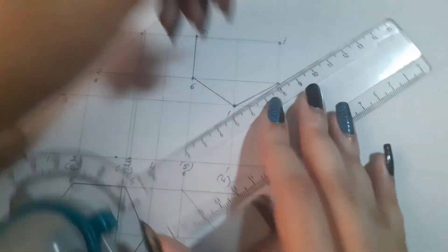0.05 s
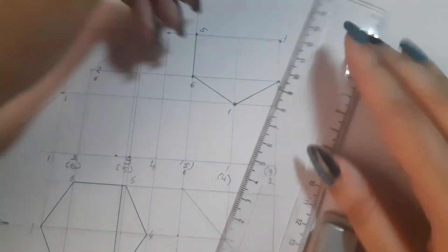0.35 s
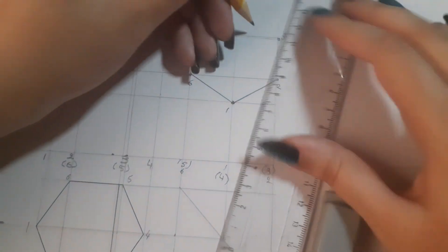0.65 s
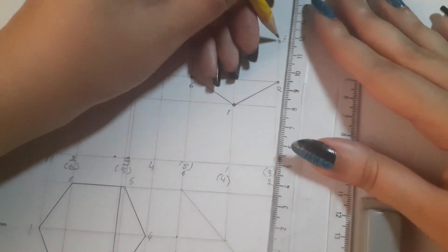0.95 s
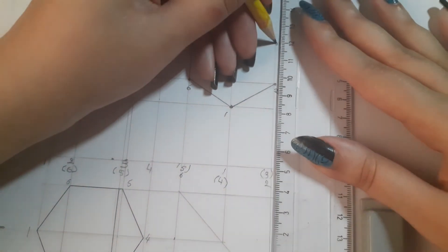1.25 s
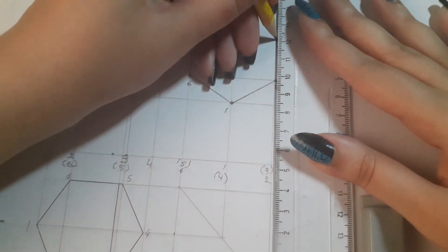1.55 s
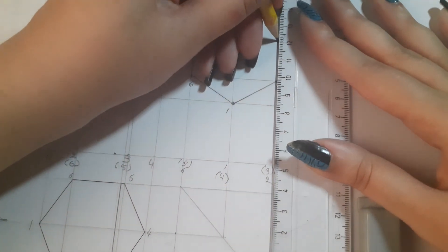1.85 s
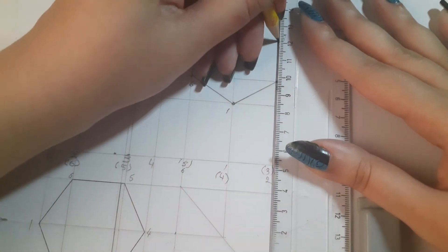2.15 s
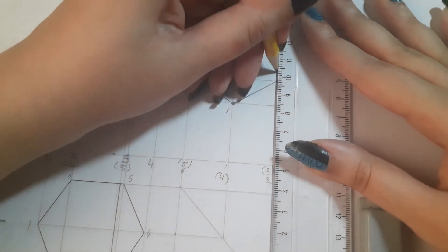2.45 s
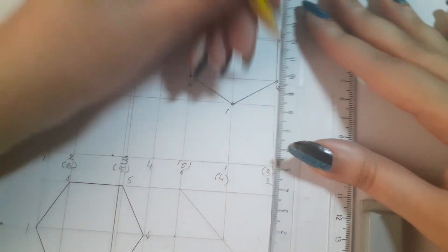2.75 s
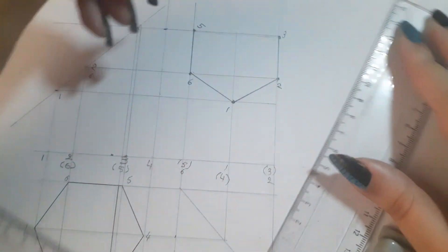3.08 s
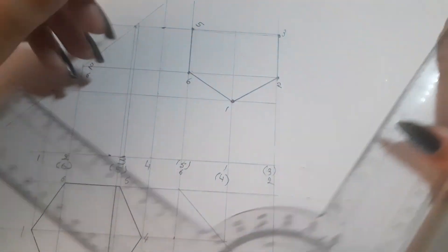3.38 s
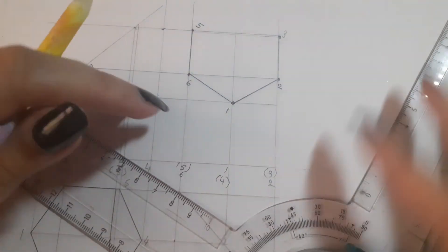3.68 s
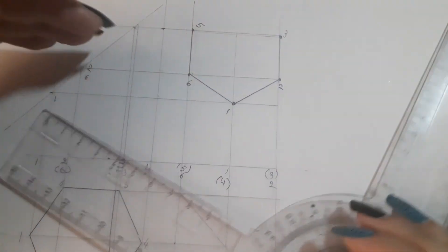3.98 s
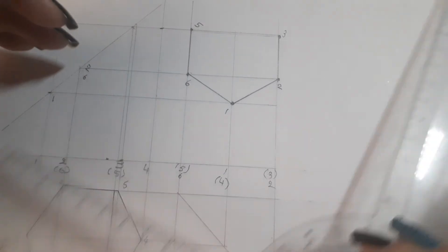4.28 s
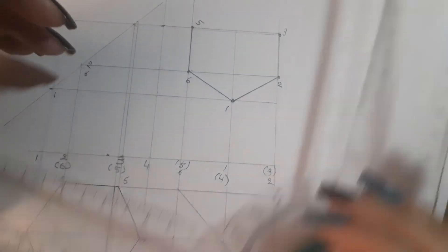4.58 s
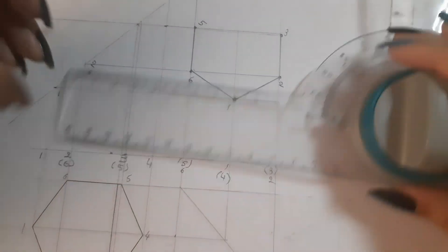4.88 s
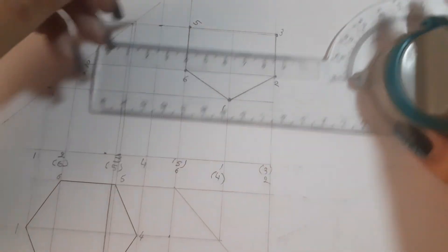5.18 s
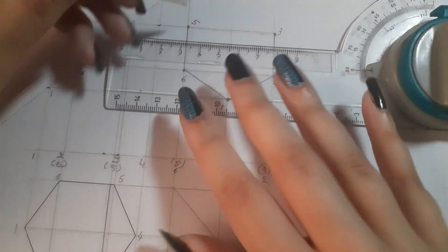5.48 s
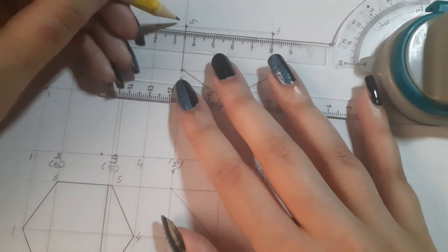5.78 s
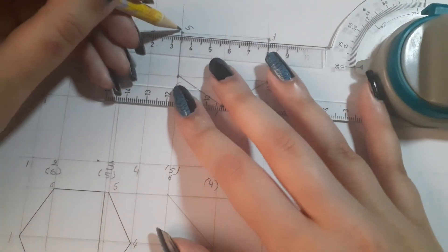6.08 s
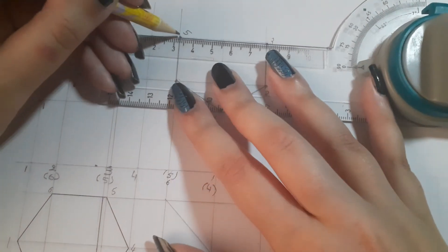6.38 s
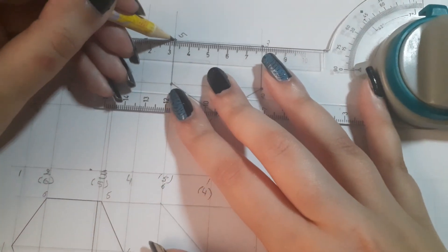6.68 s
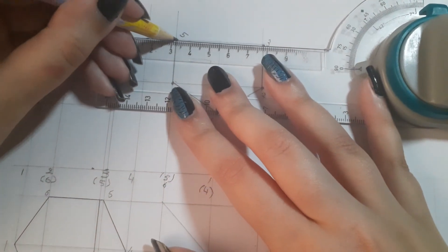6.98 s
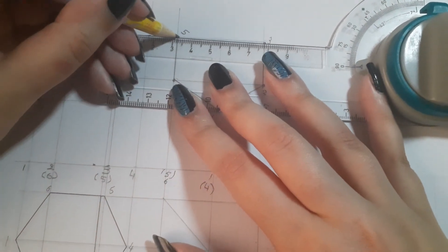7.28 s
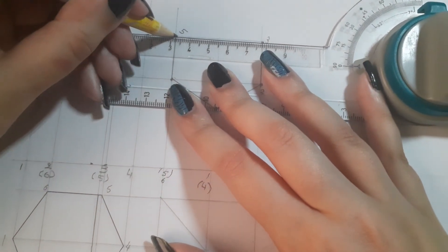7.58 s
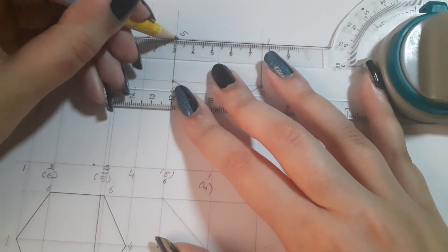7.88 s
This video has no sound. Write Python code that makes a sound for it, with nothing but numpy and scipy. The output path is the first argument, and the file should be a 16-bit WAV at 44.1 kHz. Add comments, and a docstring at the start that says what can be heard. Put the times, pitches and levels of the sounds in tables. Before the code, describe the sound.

A plastic ruler slides across paper with a hiss and clatters briefly on the desk. After some faint shifting, a pencil scratches a few quick strokes. The ruler then slides again, scraping and clacking repeatedly as it is swung round and set down. Soft hand rubs and light fingertip taps follow. Everything is close to a stereo microphone in a small, quiet room.

```python
"""A plastic drafting ruler on paper, at a desk in a small room, close to a stereo microphone.
It slides in short hissing pushes, its edge catching and singing, while the side of the hand rubs the desk.
A pencil scratches along it; then the ruler is swung round, clacks on the desk and is set down.
Nails, pencil tip and fingertips tap on it, and each contact rings the plastic and thuds in the desk."""
import sys
import numpy as np
from scipy import signal
from scipy.fft import rfft, irfft, next_fast_len
from scipy.io import wavfile

SR = 44100
rng = np.random.default_rng(int(sys.argv[2]) if len(sys.argv) > 2 else 0)


def store_pcm(level_fs):
    """Save levels as 16-bit WAV."""
    pcm = np.round(np.clip(level_fs, -1, 1) * 32767).astype(np.int16)
    wavfile.write(sys.argv[1], SR, np.atleast_2d(pcm).T)


N = 350154
TIME = np.arange(N) / SR


def from_db(db):
    return 10 ** (np.asarray(db) / 20)


def unit_rms(x):
    return x / np.sqrt(np.mean(x ** 2) + 1e-30)


def at_hz(points, hz):
    """Read a table on a log-frequency axis."""
    where, value = np.transpose(points)
    return np.interp(np.log(np.maximum(hz, 1)), np.log(where), value)


def stereo(two, alike):
    """Two unrelated signals become left and right with a given likeness."""
    return np.sqrt(1 + alike) * two[0] + np.sqrt(1 - alike) * two[1] * np.array([[1], [-1]])


def panned(x, pan_db):
    """Lean to one side at equal power; positive is left."""
    return x * unit_rms(from_db([[pan_db / 2], [-pan_db / 2]]))


# rubbing and room sound at the microphone: f/Hz, left-right likeness/0-1
LIKENESS = [(60, 0.67), (400, 0.72), (900, 0.26), (2000, 0.03), (5000, 0.079), (16000, 0.0037)]
def coloured(two, spectrum):
    """Give two noises a spectrum with falling ends and the stereo likeness; rms 1."""
    size = next_fast_len(N)
    hz = np.maximum(np.arange(size // 2 + 1) * SR / size, 1)
    skirts = 1 / np.sqrt((1 + (spectrum[0][0] / hz) ** 6) * (1 + (hz / spectrum[-1][0]) ** 6))
    sides = stereo(rfft(two, size), at_hz(LIKENESS, hz))
    return unit_rms(irfft(sides * from_db(at_hz(spectrum, hz)) * skirts, size)[:, :N])


def resonate(force, modes):
    """Parallel resonances with alternating signs."""
    out = 0
    for k, (hz, width, db) in enumerate(modes):
        r = np.exp(-np.pi * width / SR)
        poles = [1, -2 * r * np.cos(2 * np.pi * hz / SR), r * r]
        out = out + (-1) ** k * from_db(db) * (1 - r * r) / 2 * signal.lfilter([1, 0, -1], poles, force)
    return out


def friction(grains_per_s, grain_db, judder_db, judder_hz):
    """Paper fibres catch and let go: fine noise with larger grains, under uneven pressure."""
    catches = rng.random(N) < grains_per_s / SR
    grain_gain = from_db(grain_db) * np.sqrt(SR / grains_per_s)
    grainy = rng.standard_normal((2, N)) * (1 + grain_gain * catches)
    points = rng.standard_normal(int(N / SR * judder_hz) + 2)
    pressure = unit_rms(np.interp(TIME * judder_hz, np.arange(len(points)), points))
    return grainy * from_db(judder_db * pressure)


def movements(rows, rise_share, speed_power):
    """Friction gain follows a power of the hand's speed, a sine arch per move; overlaps add in power."""
    power = 0
    for start_s, length_s, db in rows:
        turns_s = start_s + length_s * np.array([0, rise_share, 1])
        speed = np.sin(np.interp(TIME, turns_s, [0, np.pi / 2, 0]))
        power = power + (from_db(db) * speed ** speed_power) ** 2
    return np.sqrt(power)


# modes of the ruler lying on the desk, scraped here and struck in knocks(): f/Hz, width/Hz, level/dB
RULER_MODES = [(101, 22, -1), (114.6, 27, -0.5), (159.9, 15, -1), (203, 31, -4.5), (249, 13, -3.5),
               (379.8, 34, -4.5), (510, 70, -5.5), (619.2, 28, 6.5), (687, 45, -4.5), (796.7, 35, 0),
               (890, 18, -0.5), (1023.4, 38, -2.5), (1200, 62, -10.5), (1610, 200, -4), (1866, 150, -3.5),
               (2000, 45, 5), (2230, 45, 1.5), (2415, 68, 1), (2587, 20, 0), (2850, 95, 0),
               (3590, 150, -4.5), (4022, 130, 1), (4270, 62, -4.5), (4450, 90, -0.5), (5126, 250, -13.5),
               (4996, 84, -9.5), (6260, 300, -15), (7240, 330, -4), (7610, 83, -11), (11700, 130, -6),
               (14000, 1600, -13)]
# spectra of the paper's hiss and the plastic's scrape: f/Hz, level/dB
PAPER_HISS = [(2600, -13), (3200, -2.5), (4000, -4), (5000, -4), (6300, -8), (7400, -3.5), (8900, -10),
              (12100, 1), (14500, -3.5), (16500, -4.5)]
RULER_SCRAPE = [(450, -2.5), (650, -4.5), (900, -1), (1300, -2.5), (1700, -2), (2100, 3.5), (2900, -4.5),
                (4000, -3), (5000, -8), (6500, -14.5)]
# pushes across the sheet: t/s, length/s, hiss level/dB, scrape level/dB
SLIDES = [(-0.01, 0.46, -39, -47.5), (0.27, .27, -50.5, -52), (0.51, .13, -54, -52),
          (0.61, 0.16, -51, -53.5), (0.7, 0.21, -43, -48), (0.84, 0.21, -59.5, -56),
          (0.96, 0.13, -58, -53.5), (1.085, 0.12, -68, -58), (1.215, .1, -70, -59), (1.42, .15, -68, -60.5),
          (1.49, 0.21, -71.5, -70), (1.76, 0.13, -75, -65), (2.675, 0.057, -61.5, -58),
          (2.722, 0.17, -43.5, -50), (2.76, 0.31, -45, -51.5), (2.95, 0.27, -48.5, -51.5),
          (3.09, 0.2, -44.5, -48.5), (3.23, 0.33, -41.5, -49.5), (3.4, 0.42, -58.5, -56.5),
          (3.71, 0.092, -50, -53.5), (3.74, 0.42, -48, -47), (4.13, .1, -61, -57), (4.21, 0.18, -44, -42.5),
          (4.34, 0.19, -59, -56), (4.5, 0.22, -67, -65), (4.712, 0.34, -55, -54.5),
          (4.85, 0.36, -48.5, -43.5), (5.12, 0.2, -50, -48), (5.28, 0.52, -73, -71.5),
          (5.532, 0.2, -58, -55.5), (5.98, 0.21, -68.5, -64.5), (6.1, 0.14, -62.5, -63),
          (6.29, 0.16, -62, -57.5), (6.38, .35, -76, -71.5), (6.7, .8, -78.5, -92), (7.42, .12, -78, -70),
          (7.65, 0.2, -67, -61)]
def ruler_slides(hiss_db, scrape_db, ring_db):
    """Just right of the microphone, paper hisses under ruler and hand; the plastic scrapes hollowly."""
    fibres = friction(grains_per_s=4600, grain_db=-7.5, judder_db=0.83, judder_hz=100)
    hiss = coloured(fibres, PAPER_HISS)
    drag = friction(grains_per_s=3100, grain_db=-5.0, judder_db=2.57, judder_hz=56)
    ring = unit_rms(resonate(drag, [mode for mode in RULER_MODES if 450 < mode[0] < 5200]))
    scrape = unit_rms(coloured(drag, RULER_SCRAPE) + from_db(ring_db) * ring)
    pushes = np.array(SLIDES)
    hiss *= movements(pushes[:, [0, 1, 2]], rise_share=0.4, speed_power=1.5)
    scrape *= movements(pushes[:, [0, 1, 3]], rise_share=0.4, speed_power=1.5)
    return panned(from_db(hiss_db) * hiss + from_db(scrape_db) * scrape, pan_db=-3.0)


# spectrum of skin on the sheet: f/Hz, level/dB
HAND_RUB = [(60, -17.5), (110, -10), (160, -3), (280, 1), (420, -6.5), (600, -4.5), (850, -13)]
# drags of the side of the hand: t/s, length/s, level/dB
RUBS = [(0.06, 0.62, -53), (0.48, 0.36, -59.5), (0.72, 0.29, -59.5), (0.975, 0.12, -56.5),
        (1.38, 0.24, -67), (1.53, 0.26, -60), (1.8, 0.12, -59), (1.9, 0.21, -71), (2.7, 0.18, -59),
        (3.03, 0.21, -60), (3.25, 0.49, -58), (3.7, 0.48, -56.5), (4.22, 0.34, -58.5), (4.74, 0.21, -59),
        (5.0, 0.68, -72), (6.0, 0.35, -65.5), (6.28, 0.19, -57.5), (6.45, 2.07, -70.5), (6.6, .1, -61.5),
        (7.42, 0.12, -64.5), (7.65, 0.19, -64)]
def hand_rubs(gain_db):
    """In the centre, skin drags on the sheet and the desk murmurs under it."""
    drag = friction(grains_per_s=550, grain_db=-10.0, judder_db=2.5, judder_hz=25)
    moving = movements(RUBS, rise_share=0.18, speed_power=0.95)
    return from_db(gain_db) * moving * coloured(drag, HAND_RUB)


# resonances of the ruler's edge: f/Hz, width/Hz, level/dB
EDGE_MODES = [(580, 110, 1), (2020, 130, -2.5), (2300, 120, -2.5), (4080, 150, -4), (4530, 120, -4)]
# the edge catches on the sheet: middle t/s, half-length/s, level/dB
CATCHES = [(0.18, 0.011, -43.5), (1.265, 0.019, -64), (1.48, 0.012, -65.5), (1.814, 0.023, -70),
           (2.787, 0.0086, -45), (3.78, .03, -51), (4.188, 0.022, -59.5), (4.286, 0.015, -43),
           (4.787, 0.018, -45.5), (4.878, 0.026, -44)]
def edge_catches(pan_db):
    """The ruler's edge sticks and slips quickly, singing in short swells."""
    swells = sum(from_db(db) * np.exp(-((TIME - s) / half_s) ** 2 / 2) for s, half_s, db in CATCHES)
    drag = friction(grains_per_s=1200, grain_db=-4.0, judder_db=2.5, judder_hz=130)
    singing = unit_rms(resonate(stereo(drag, alike=0.26), EDGE_MODES))
    return panned(swells * singing, pan_db)


# ruler, nails or pencil knock:
# t/s, level/dB, hardness/dB, desk thud level/dB, favoured f/Hz, left-right/dB, chatter/s
KNOCKS = [(0.3787, -38, -5, -47.5, 3170, -3.5, .0011), (0.4032, -35, 5.5, -64, 5230, -3.5, .0011),
          (0.4165, -52.5, 2.5, -50, 5200, 6, .0016), (0.4384, -45.5, -3, -52.5, 3300, -0.5, 0.0011),
          (0.457, -55, -10.5, -54, 1110, -6, 0.0042), (0.630, -55.5, -5.5, -73, 820, -4, .0011),
          (0.66, -53, -8, -57, 840, -3, 0.0023), (2.2299, -82, -2, -75, 2300, -21, 0.0038),
          (2.8627, -47, -6.5, -59, 786, -7, 0.0014), (3.113, -58.5, -3.5, -83, 950, -16, 0.0017),
          (3.5012, -33, -3.5, -46, 970, -6.5, 0.0024), (3.822, -36, -7, -40.5, 970, -15.5, 0.0024),
          (3.83, -41.5, 3.5, -43, 890, 1, 0.0038), (3.839, -47, -11.5, -47, 890, -8.5, 0.002),
          (3.879, -63, 10, -48, 1200, -7.5, 0.0015), (3.9063, -31, -9, -44.5, 1620, -11.5, .0012),
          (3.9308, -40, -4.5, -50.5, 2300, -3.5, 0.01), (3.9455, -35.5, -1.5, -55, 2630, -2.5, 0.0059),
          (3.9715, -52, 2.5, -54.5, 2500, -4.5, 0.0015), (4.3056, -40, 1, -51, 2300, -4, 0.012),
          (4.3252, -36, 2, -62.5, 2117, -5.5, 0.0062), (4.331, -41, -3, -52.5, 2000, -6, 0.005),
          (4.3847, -29.5, 4, -52, 2300, -2.5, 0.0024), (4.401, -49, -7.5, -54, 2040, -4, 0.00089),
          (4.5556, -38.5, -1, -54, 2030, -5, 0.0043), (4.7378, -34, -.5, -53, 2090, -6, 0.0031),
          (4.9341, -28.5, 4, -50, 2450, -2, 0.0035), (4.938, -35.5, 8, -57.5, 2300, -3.5, .0016),
          (4.962, -37.5, -2.5, -46.5, 2520, -1.5, 0.0044), (4.981, -40.5, 3, -45.5, 2070, -5, .0017),
          (4.989, -44.5, 4.5, -44, 2100, -6.5, 0.0039), (5.056, -73, 15, -68, 2200, 1, 0.0022),
          (5.119, -56, -7.5, -58.5, 1760, -3, 0.0078), (5.2317, -43.5, -2.5, -47.5, 1880, 4, 0.0072),
          (5.251, -48.5, -3.5, -51, 2920, -10, 0.0044), (5.55, -55.5, 1, -67, 3560, -4, .0012),
          (5.5726, -57.5, -14.5, -51.5, 1560, -7, 0.0037), (5.581, -55.5, 3.5, -57, 2670, -4, 0.015),
          (5.607, -62, 13.5, -68, 3220, 0, .0024), (6.2943, -49.5, -3, -55, 1720, -8, 0.0015),
          (6.2995, -52.5, 8, -64, 4000, -6, 0.0014)]
# soft fingertips settle on the ruler: t/s, level/dB
TOUCHES = [(1.025, -70), (1.141, -72.5), (1.541, -70), (6.074, -70), (6.161, -72), (6.624, -78),
           (6.942, -77.5), (7.443, -75.5), (7.598, -74.5), (7.703, -68.5), (7.748, -73)]
def contacts(lively_db=12, lively_hz=2300, lively_octaves=0.97):
    """Register levels of each contact: a hard one trades hollow knock for crack, a lively spot rings."""
    touches = [(s, db, -6, db - 10.5, 1060, -12, 0.0025) for s, db in TOUCHES]   # columns as in KNOCKS
    for s, db, hardness_db, thud_db, spot_hz, pan_db, chatter_s in KNOCKS + touches:
        ring_db = lively_db * np.exp(-(np.log2(spot_hz / lively_hz) / lively_octaves) ** 2)
        yield s, (thud_db, db - hardness_db, db + ring_db, db + hardness_db), spot_hz, pan_db, chatter_s


# registers (thud, hollow knock, ring, crack): low f/Hz, high f/Hz, attack/s, left-right likeness/0-1
REGISTERS = [(65, 350, .04, .9), (350, 1400, .012, .75), (1400, 5500, .012, .3), (5500, 16500, .012, .1)]
# loudness of the thud, hollow knock, ring and crack: level/dB
REGISTER_GAIN_DB = [0.27, 2.3, 1.3, 2.4]
def knocks(strike_db, buzz_s, buzz_db, direct_db, damping, mode_spread_db, spot_db, spot_octaves):
    """A sharp strike, milliseconds of chatter and a faint buzz set the ruler and desk ringing close by."""
    size = 6144
    t, out = TIME[:size], np.zeros((2, N + size))
    hz = np.maximum(np.arange(size // 2 + 1) * SR / size, 1)
    click = 1. * (t == 0)
    # the fingers damp the plastic's modes, but not the desk's low ones
    held = [(f, width * (damping if f > 450 else 1), db) for f, width, db in RULER_MODES]
    rings = rfft([resonate(click, [mode]) * (-1) ** k for k, mode in enumerate(held)])
    mode_hz = np.array(RULER_MODES)[:, 0]
    filters = [signal.butter(3, band[:2], "band", fs=SR, output="sos") for band in REGISTERS]
    passbands = [signal.sosfreqz(sos, hz, fs=SR)[1] for sos in filters]
    cushion = signal.freqz(*signal.butter(2, 15200, fs=SR), hz, fs=SR)[1]   # the sheet softens each blow
    for s, levels_db, spot_hz, pan_db, chatter_s in contacts():
        press = np.exp(-t / chatter_s) + from_db(buzz_db) * np.exp(-t / buzz_s)
        force = press * rng.standard_normal((2, size))
        force[0] += from_db(strike_db) * click
        # each spot favours the modes near its own pitch, and others by chance
        near = np.exp(-(np.log2(mode_hz / spot_hz) / spot_octaves) ** 2)
        strengths = from_db(spot_db * near + mode_spread_db * rng.standard_normal(len(mode_hz)))
        body = rfft(force) * cushion * ((strengths[:, None] * rings).sum(0) + from_db(direct_db))
        at = round(s * SR)
        for k, (low_hz, _, attack_s, alike) in enumerate(REGISTERS):
            part = stereo(irfft(body * passbands[k]), alike)
            attack_rms = np.sqrt(np.mean(part[:, :round(attack_s * SR)] ** 2, axis=1, keepdims=True))
            part = panned(part / attack_rms, pan_db * min(1, low_hz / 800))   # bass stays near the centre
            out[:, at:at + size] += from_db(levels_db[k] + REGISTER_GAIN_DB[k]) * part
    return out[:, :N]


# spectrum of the graphite's rasp: f/Hz, level/dB
GRAPHITE = [(70, -12), (195, -4.5), (440, -18), (620, -2), (890, -0.5), (1450, -16.5), (2320, 0.5),
            (3000, -10), (4700, -10.5), (6900, -21.5), (7900, -12), (9300, -26.5), (11400, -11),
            (16000, -17)]
# resonances under the pencil tip: f/Hz, width/Hz, level/dB
TIP_MODES = [(880, 10, -2), (1123, 72, -2), (1650, 33, -6), (2300, 48, 1.5), (2720, 40, -17),
             (3940, 55, -14), (4740, 31, -16)]
# strokes along the ruler: t/s, length/s, level/dB
STROKES = [(2.226, 0.1, -43), (2.305, 0.17, -43), (2.488, 0.094, -49), (2.594, 0.087, -53)]
def pencil_strokes(gain_db, ring_db):
    """A little to the right, graphite crumbles on the paper's grain, shaking pencil and ruler's edge."""
    drag = friction(grains_per_s=460, grain_db=-8.5, judder_db=1.0, judder_hz=270)
    ring = unit_rms(resonate(stereo(drag, alike=0.35), TIP_MODES))
    rasp = unit_rms(coloured(drag, GRAPHITE) + from_db(ring_db) * ring)
    moving = movements(STROKES, rise_share=0.38, speed_power=0.51)
    return panned(from_db(gain_db) * moving * rasp, pan_db=-3.5)


# decay of the small room: f/Hz, t60/s (floored at shortest_t60_s)
ROOM_T60 = [(100, 0.38), (500, 0.2851), (2000, 0.1854), (6000, 0.33), (12000, -0.48)]
# its reflections against the direct sound, close to the desk: f/Hz, level/dB
ROOM_DB = [(100, -8), (500, -6), (2000, -15), (6000, -13.5), (15000, -16.5)]
def room_reflections(x, first_echo_s, shortest_t60_s):
    """Diffuse reflections reach the microphone, octave by octave, dying soonest in the top one."""
    t, response = TIME[:SR * 2 // 3], 0
    build_up = np.clip(t / first_echo_s - 1, 0, 1)
    for hz in 88 * 2. ** np.arange(8):
        sos = signal.butter(2, [hz / np.sqrt(2), hz * np.sqrt(2)], "band", fs=SR, output="sos")
        noise = stereo(signal.sosfilt(sos, rng.standard_normal((2, len(t)))), at_hz(LIKENESS, hz))
        t60_s = max(at_hz(ROOM_T60, hz), shortest_t60_s)
        tail = unit_rms(noise * build_up * np.exp(-np.log(1000) * t / t60_s))
        octave_gain = np.sqrt(np.sqrt(2) * hz / SR / len(t))
        response = response + from_db(at_hz(ROOM_DB, hz)) * tail * octave_gain
    return signal.fftconvolve(x, response, axes=1)[:, :N]


# spectrum of the background at the desk: f/Hz, level/dB
ROOM_TONE = [(30, -19), (100, -4.5), (290, 0), (420, -7), (1000, -11), (2200, -12.5), (4200, -14),
             (7000, -21), (9400, -26), (12500, -9), (16000, -13)]
def room_tone(level_db):
    """A faint, steady low murmur with a thin hiss on top."""
    return from_db(level_db) * coloured(rng.standard_normal((2, N)), ROOM_TONE)


def scene():
    """The desk from close by, with the small room behind it."""
    desk = knocks(strike_db=13, buzz_s=0.014, buzz_db=-18, direct_db=-12.5,
                  damping=1.6, mode_spread_db=2.5, spot_db=7.5, spot_octaves=0.29)
    desk += ruler_slides(hiss_db=-0.05, scrape_db=-2.5, ring_db=-7.5)
    desk += edge_catches(pan_db=-6.5)
    desk += hand_rubs(gain_db=-1.46)
    desk += pencil_strokes(gain_db=1.0, ring_db=-0.5)
    background = room_tone(level_db=-69.5)
    return desk + room_reflections(desk, first_echo_s=0.0043, shortest_t60_s=0.04) + background


# colour of the microphone's two ports: f/Hz, left-right level/dB
PORTS = [(60, 3), (300, 1.5), (600, 2.5), (1100, 0.5), (2000, -5.5), (4000, 0), (8000, 1), (13000, -2.5)]
def record(dry):
    """Each microphone port colours its side; peaks are rounded and the top is cut steeply at 16 kHz."""
    size = next_fast_len(N)
    tilt_db = at_hz(PORTS, np.arange(size // 2 + 1) * SR / size)
    heard = irfft(rfft(dry, size) * from_db([tilt_db / 2, -tilt_db / 2]), size)[:, :N]
    top_cut = signal.ellip(10, .1, 80, 16000, fs=SR, output="sos")
    return signal.sosfilt(top_cut, np.tanh(heard))


dry = scene()
out = record(dry)
store_pcm(out)
```